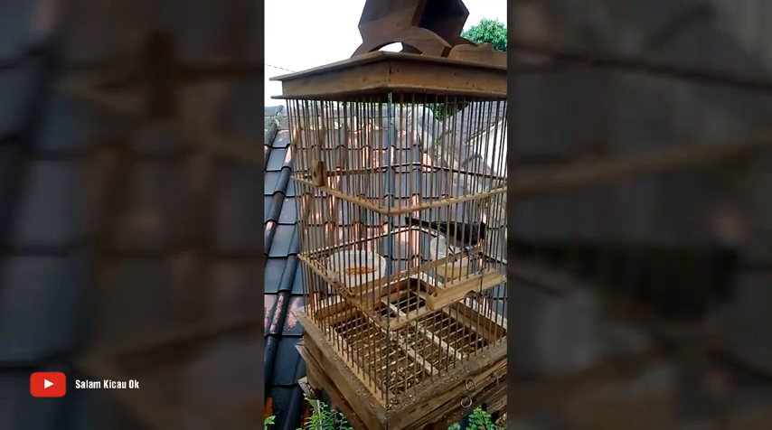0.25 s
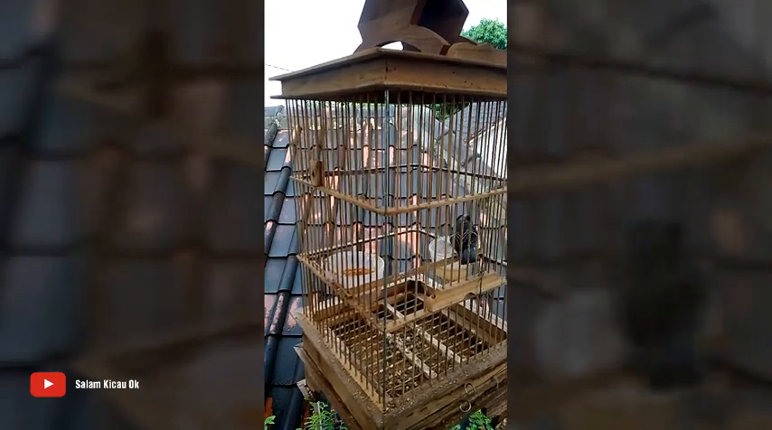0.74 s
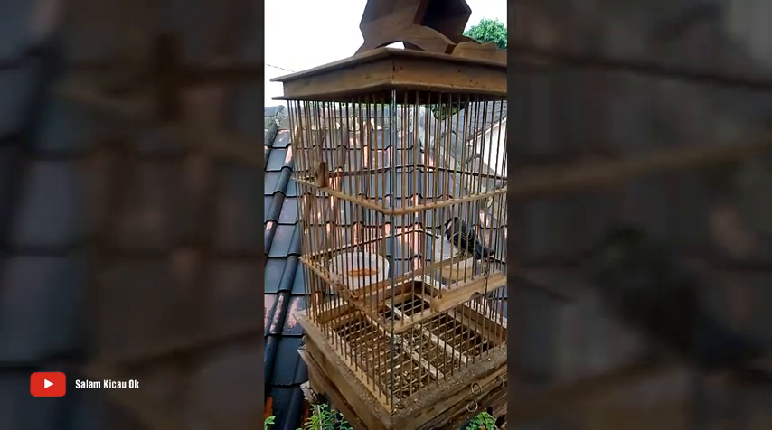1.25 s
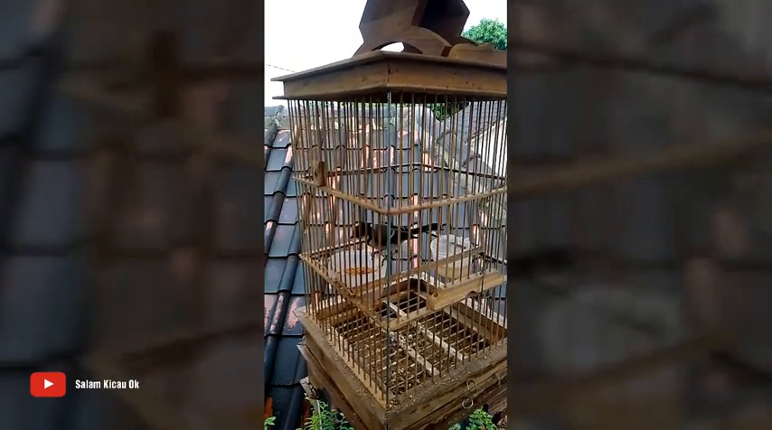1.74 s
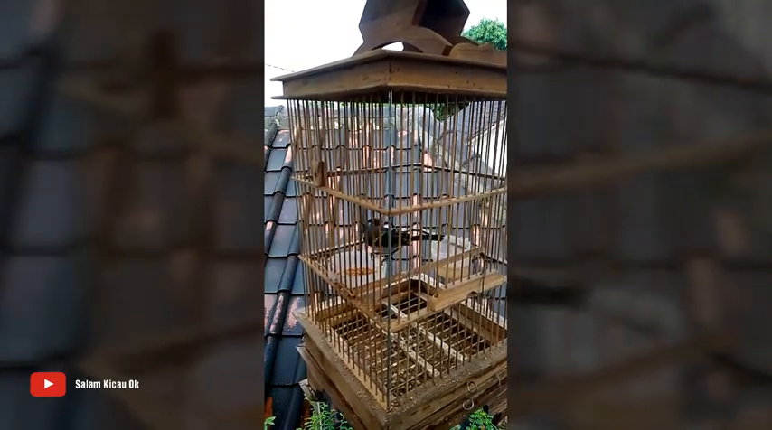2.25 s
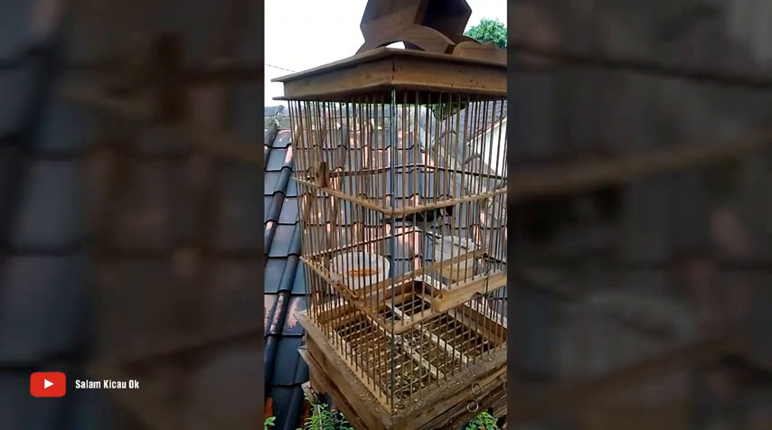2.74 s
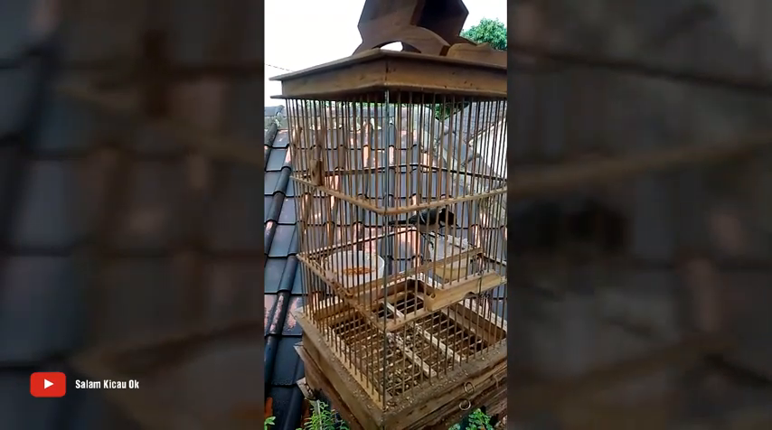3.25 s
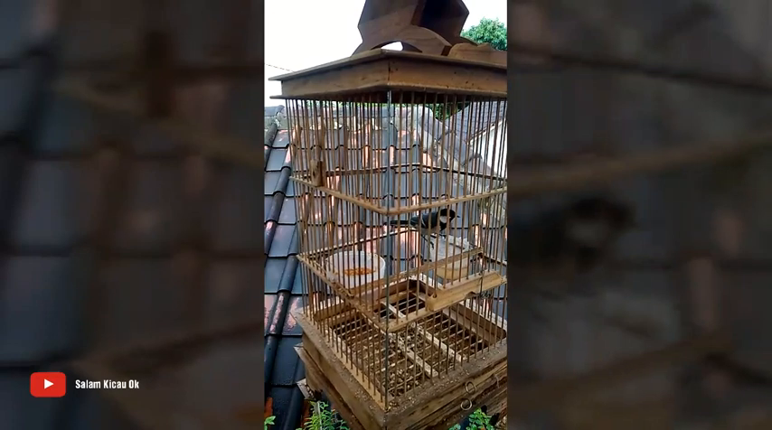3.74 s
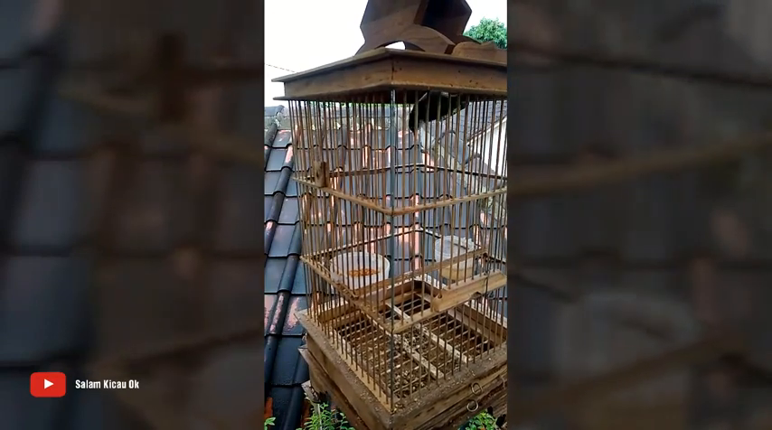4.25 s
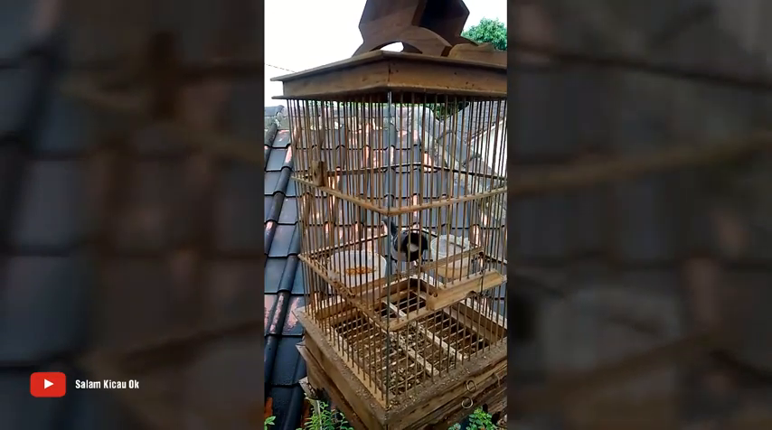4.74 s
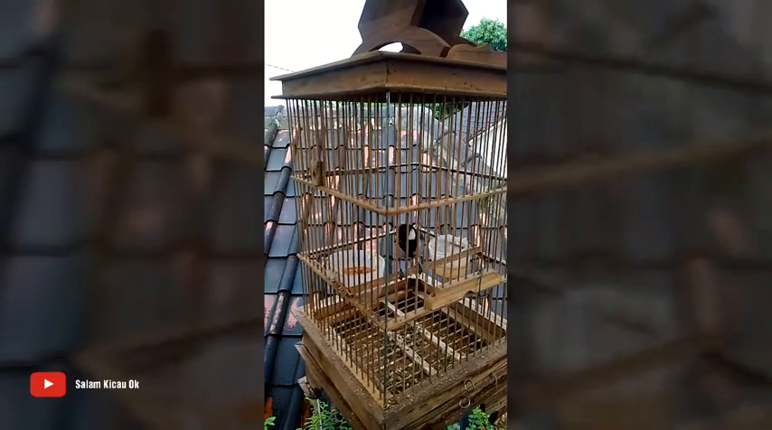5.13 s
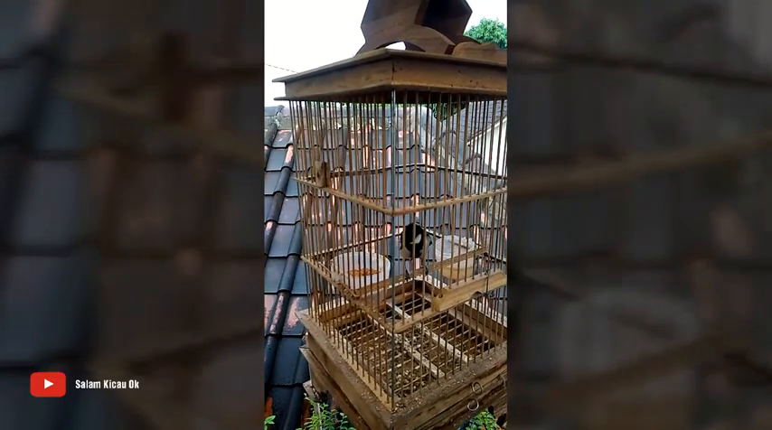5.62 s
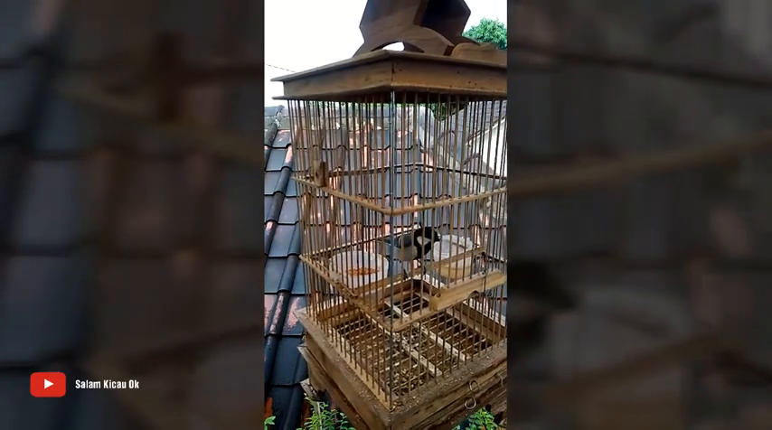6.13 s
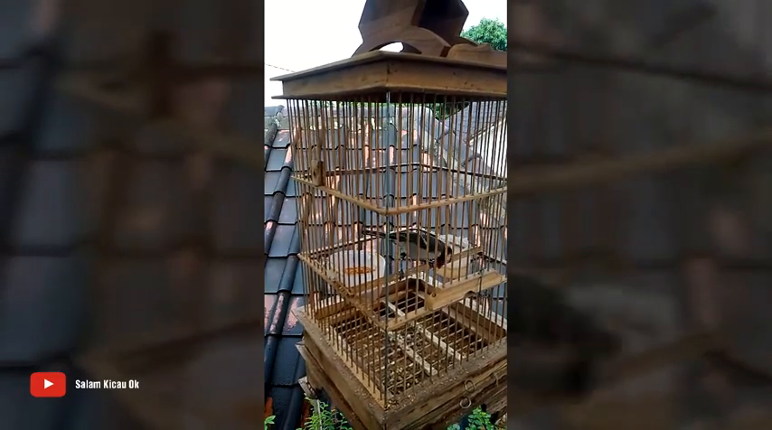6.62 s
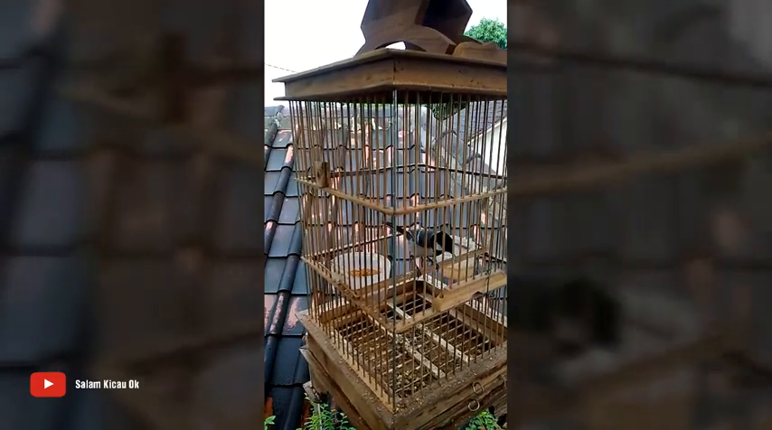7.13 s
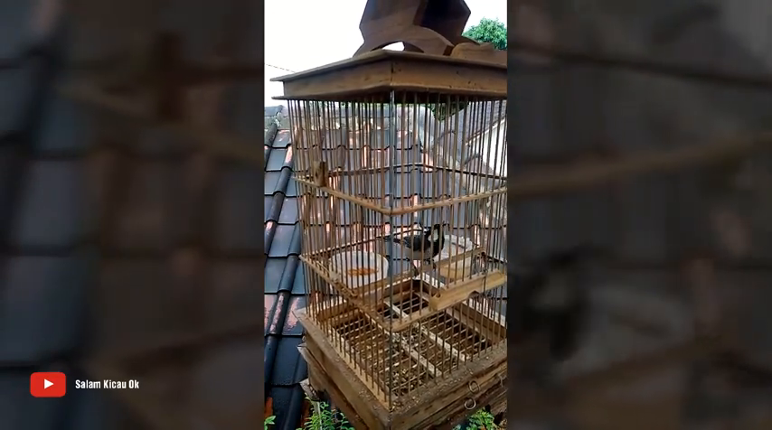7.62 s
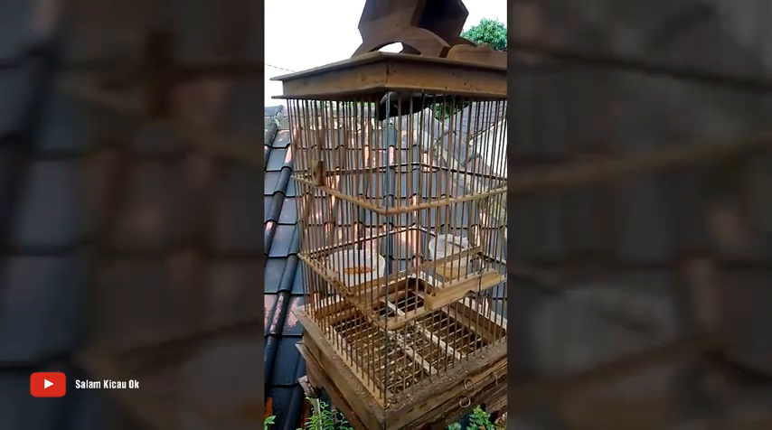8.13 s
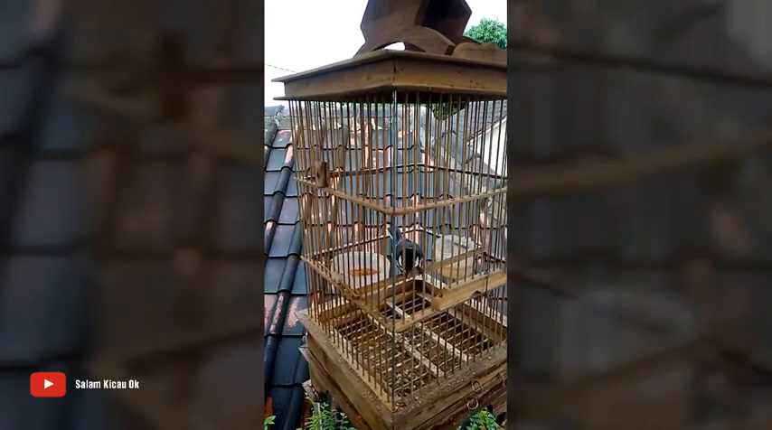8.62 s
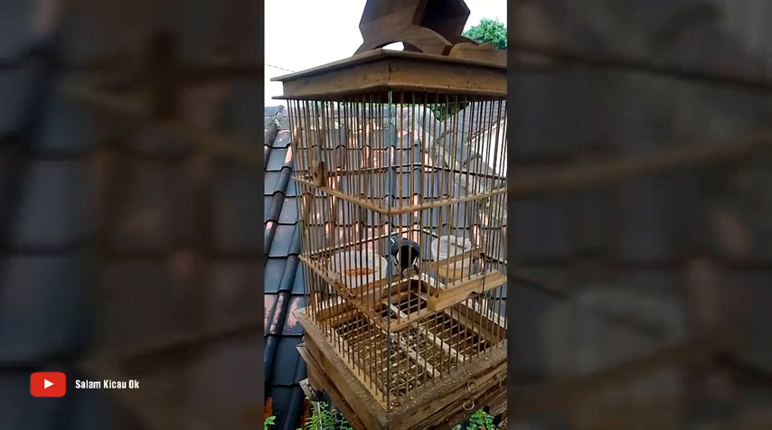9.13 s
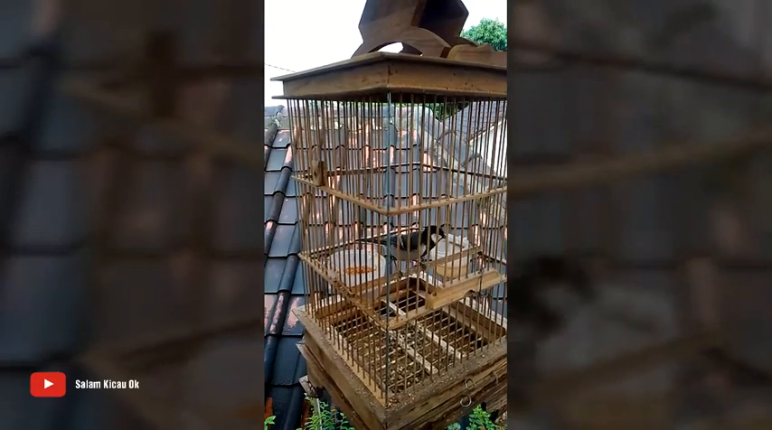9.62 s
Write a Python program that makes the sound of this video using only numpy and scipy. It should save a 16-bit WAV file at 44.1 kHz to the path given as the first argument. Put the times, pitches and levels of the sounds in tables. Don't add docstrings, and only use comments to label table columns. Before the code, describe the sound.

A small songbird in a wooden cage outdoors on a tiled roof. Claws snap and tick on bars first, feet tap perches, then a lone high whistle, two slurred chirps, a series of piercing whistles and five short raspy buzzes. A quick warble, a hopping pause, another whistle, three chirps and two bright swoops follow. Close microphone, sound leaning left, short tail, faint leaves and wind.

```python
import sys
import numpy as np
from scipy import signal
from scipy.fft import rfft, irfft, next_fast_len
from scipy.io import wavfile
from scipy.ndimage import uniform_filter1d

SR = 44100
rng = np.random.default_rng(int(sys.argv[2]) if len(sys.argv) > 2 else 0)


def invert_db(x):
    u = np.asarray(x, float) / 20
    return 10 ** u


def file_out(sig):
    cols = np.atleast_2d(sig).T
    lim = np.clip(cols, -1, 1)
    pcm = np.round(lim * 32767).astype(np.int16)
    wavfile.write(sys.argv[1], SR, pcm)


N = 435266
TOP_HZ = 15740

# share (0-1 of length), pitch_ratio, level_db, overtone_db
WHISTLE_SHAPE = [(0, .72, -30, 10), (.1, .84, -19, 8), (.2, .93, -9, 4), (.35, .962, -3, 0),
                 (.82, 1.0, 0, 0), (.88, .95, -10, 9), (1, .78, -24, 16)]
SWOOP_SHAPE = [(0, .38, -34, 22), (.2, .45, -21, 29), (.29, .62, -14, 26), (.36, .81, -3, 3),
               (.5, .855, -1.5, -1), (.79, .885, -7, 0), (.87, 1.0, 1.5, -20), (1, 0.97, -6, 5)]
SLIDE_SHAPE = [(0, .36, -32, 22), (.12, .5, -20, 24), (.2, .66, -8, 14), (.28, .83, -3, -6),
               (.45, .9, 0, -2), (.72, 1.0, -2, -8), (1, .96, -9, -8)]
RISE_SHAPE = [(0, .64, -23.5, 4.5), (.2, .73, -11, 2.5), (.45, .82, -6, 5.5), (.74, .88, -4.5, 10),
              (.84, 1.0, 6, -2.5), (1, 0.6, -11, -3.5)]
HOLD_SHAPE = [(0, .88, -8, 0), (.25, 0.93, -8, 0), (.5, 0.99, -1.5, 0), (.8, 1.0, -1, 0),
              (.88, .94, -15, 0), (1, 0.8, -30, 0)]
FALL_SHAPE = [(0, 1.16, -11.5, 4.5), (.3, 1.06, -4, -7), (.55, 1.0, -2, -8.5), (.85, .92, -10, -8),
              (1, 0.83, -18, 1)]
CHIP_SHAPE = [(0, 0.6, -12.5, -13), (.3, .93, -4, 2), (.45, 0.96, -1, 5.5), (.7, .94, -5.5, 4.5),
              (1, .8, -8, -9.5)]
BUZZ_SHAPE = [(0, .74, -11, -16), (.2, .84, -2, -13), (.45, .97, 0, -4), (.65, 1.0, -2, 2.5),
              (.82, .98, -4.5, 2), (1, .92, -28, -1)]
ARCH_SHAPE = [(0, 0.76, -21.5, -5), (.25, 0.94, -10, 2), (.55, 0.98, -1, -8.5), (.8, .78, 5, -15.5),
              (1, 0.72, -23, -9)]
LEDGE_SHAPE = [(0, .74, -12, 9), (.3, .8, -5, 9), (.68, .85, -8, 8), (.8, .97, 2, -18), (.88, 1.0, 2, -18),
               (.94, .85, -8, -8), (1, .6, -12, -4)]
RAMP_SHAPE = [(0, .7, -9, 6), (.45, .84, -1, 0), (.6, .91, -5, 2), (.69, 1.0, 1, -2), (.8, .86, -11, 0),
              (1, .65, -13, -8)]

# multiple, level_db
PURE = [(1, 0), (2, 0), (3, -15)]
THIN = [(1, 0), (2, 0), (3, -24)]
SHARP = [(1, 0), (2, -13), (3, 0)]
HOLLOW = [(1, 0), (2, 0), (3, -19)]
CUPPED = [(1, 0), (2, 0), (3, -9)]
STACK = [(2, -18), (3, 3), (4, -4), (5, -14), (6, -3), (7, -9), (8, 4), (9, -1), (10, -13), (11, -13)]
RASP = [(2, -5), (3, -1.5), (4, -1.5), (5, 2.5), (6, -3), (7, -10), (8, -20.5), (9, -24.5), (10, -24)]

# start_s, length_s, pitch_hz, level_db, glide (depth)
WHISTLES = [
    (1.712, .056, 7000, -28, .9),
    (4.506, .057, 7030, -28, .9),
    (4.809, .064, 6920, -25, 1.3),
    (5.134, .055, 6930, -25.5, .95),
    (5.497, .063, 6870, -25, 2.2),
    (8.068, .056, 7000, -26, .9),
]
WHISTLE_OVERTONES = [-22.5, -25, -24.5, -20, -22, -16]
# start_s, level_db
LEADS = [
    (5.13, -43),
    (5.498, -37),
    (8.062, -58),
]
TAILS = [
    (1.756, -38),
    (5.551, -42),
]

# start_s, length_s, level_db, overtone_db, glide
CHIPS = [
    (3.176, 0.044, -56, -3, 1.2),
    (3.572, 0.046, -58.5, -2, 1.2),
    (8.509, 0.053, -47.5, 4, 0.7),
    (8.83, 0.034, -45.5, 5.5, 1.4),
    (9.157, 0.035, -54, 6, 1.3),
]
CHIP_FALLS = [-44, -44, -43, -42, -46]
# start_s, top_hz, level_db, overtone_db, glide
RISES = [
    (3.285, 5160, -40.5, 1.5, 0.52),
    (3.672, 5580, -40, -3.5, 0.92),
    (8.608, 5620, -38.5, 9.5, 0.99),
    (8.932, 5550, -39.5, 1, .92),
    (9.261, 5540, -39.5, 0.5, .92),
]
# start_s, length_s, pitch_hz, level_db, overtone_db
HOLDS = [
    (3.323, 0.04, 4180, -36, 7.5),
    (3.715, 0.042, 4330, -33, 5),
    (8.648, 0.048, 4200, -39.5, 2),
    (8.974, 0.046, 4200, -45.5, 11.5),
    (9.303, 0.043, 4200, -47.5, 17.5),
]
# start_s, length_s, pitch_hz, level_db, glide
CROSSES = [
    (3.357, .034, 4200, -28.5, 1),
    (3.757, 0.025, 3790, -39.5, 1.0),
    (8.687, 0.019, 4190, -30, 0.81),
    (9.004, 0.027, 4250, -35, 1.0),
    (9.336, 0.029, 4400, -33, 0.87),
]

# start_s, length_s, pitch_hz, level_db, glide
SWOOPS = [
    (9.663, .046, 6825, -22.5, 1.2),
    (9.819, 0.048, 6670, -22, 1.1),
]
SLIDES = [
    (6.531, .062, 6700, -26, 1.0),
]
LEDGES = [
    (6.553, .064, 5780, -29.5, 1.0),
]
RAMPS = [
    (6.67, .066, 4480, -32, 1.0),
]
HOOKS = [
    (6.655, 0.011, 4560, -30, 2.3),
]
DROPS = [
    (5.138, 0.033, 4320, -71, 0.49),
    (5.14, 0.028, 8560, -37.5, 0.55),
    (5.318, 0.022, 3050, -47.5, 0.69),
    (6.611, 0.0068, 4370, -29, 2.26),
    (9.861, 0.014, 6000, -35, -.4),
    (9.862, 0.013, 6900, -36, -.3),
]
# start_s, pitch_hz, level_db, overtone_db
SQUEAKS = [
    (1.893, 3530, -50.5, 16),
    (4.642, 3680, -42.5, 10.5),
    (4.997, 3500, -54.5, 8),
]
# start_s, length_s, pitch_hz, level_db
BUZZES = [
    (5.664, 0.089, 1418, -35),
    (5.772, 0.09, 1363, -35.5),
    (5.88, 0.087, 1388, -36.5),
    (5.986, .08, 1360, -37),
    (6.098, 0.083, 1359, -38.5),
]

# frequency_hz, density_db (per Hz)
HAZE_SPECTRUM = [(1060, -77), (1800, -29.5), (3570, -20), (3770, -30.5), (5600, -10.5), (6530, -11.5),
                 (9190, -7), (14300, -22), (15700, -30)]
# start_s, peak_db, centre_hz, left_minus_right_db
SNAPS = [(0.2674, -64, 10500, 12), (0.2957, -34, 8900, 10), (0.4833, -37, 9760, 21), (0.509, -30, 9800, 19),
         (0.5457, -43, 10900, 12), (2.4942, -52, 10200, 10), (2.589, -50, 10000, 10), (2.897, -50, 9150, 9),
         (3.5548, -55, 8700, 0), (4.0297, -62, 10900, 9), (4.213, -40, 10200, 17), (4.4573, -45, 8720, 21),
         (4.5989, -39, 8240, 14), (5.0492, -35.5, 8700, 16), (5.4171, -57, 9200, 12),
         (6.2496, -32, 12400, 17), (7.8316, -55.5, 10700, 15), (8.0555, -42, 8500, 12),
         (8.2776, -58, 9550, 17), (8.3194, -66, 8590, 9), (8.5809, -39, 8710, 14)]
# start_s, peak_db, centre_hz, t60_s
TICKS = [(0.2625, -59, 9150, 0.34), (0.296, -43, 9000, 0.17), (0.294, -54.5, 4600, 0.22),
         (0.484, -35, 10300, 0.093), (0.5107, -43, 9600, 0.11), (.5457, -53, 10500, .18),
         (2.124, -59, 7570, 0.41), (2.153, -61.5, 6750, 0.3), (2.303, -56, 7000, 0.3),
         (2.492, -46.5, 8940, 0.24), (2.587, -50.5, 8950, 0.18), (2.897, -45, 8250, 0.22),
         (2.9682, -64, 7200, 0.15), (3.546, -51, 8065, 1), (4.0297, -61, 10900, 0.2),
         (4.084, -60.5, 6860, 0.75), (4.2096, -49.5, 8900, 0.24), (4.386, -48.5, 7600, 0.19),
         (4.458, -55, 9200, 0.06), (4.5965, -46, 9100, 0.22), (5.01, -43.5, 8500, 0.27),
         (5.4165, -51.5, 7850, 0.18), (6.2512, -35.5, 11100, 0.19), (7.21, -67.5, 8640, 0.13),
         (7.3328, -56.5, 8080, 0.16), (7.524, -58.5, 6770, 1), (7.7495, -61, 7410, 0.23),
         (8.051, -47, 9300, 0.84), (8.413, -53.5, 10700, 0.32), (8.4795, -55, 9405, 0.15),
         (8.581, -37, 9250, 0.34)]
# start_s, peak_db, centre_hz, t60_s, left_minus_right_db
KNOCKS = [(0.255, -51, 1450, 0.09, 15), (0.401, -61, 1040, 0.49, 20), (0.578, -70, 790, 0.19, 30),
          (1.019, -64, 2040, 0.046, 2.5), (1.195, -51, 660, 0.076, 13.5), (2.154, -55.5, 720, 0.21, 25),
          (2.304, -67.5, 704, 0.087, 35), (3.525, -49.5, 1980, 0.11, 18), (3.732, -41, 1136, 0.15, 13),
          (4.205, -50, 2840, 0.085, 16), (4.505, -47, 914, 0.22, 17), (4.621, -44, 1610, 0.077, 9),
          (5.027, -56.5, 837, 0.44, 22), (7.17, -60.5, 860, 0.21, 33), (7.245, -63, 674, 0.21, 22),
          (7.335, -67.5, 954, 0.13, 29.5), (7.611, -54, 692, 0.19, 23), (8.584, -51, 1510, 0.26, 17)]
# start_s, peak_db, centre_hz, t60_s, left_minus_right_db
FAINT_KNOCKS_EARLY = [(0.874, -71, 724, 0.07, 12), (1.115, -58, 525, 0.07, 14), (1.195, -57, 670, 0.07, 9),
                      (1.326, -60, 676, 0.089, 16), (1.395, -62, 538, 0.055, 14), (1.743, -63, 673, 0.07, 12),
                      (1.842, -69, 676, 0.07, 10), (1.908, -39, 2840, 0.08, 14), (2.162, -58, 710, 0.055, 14),
                      (2.308, -67, 762, 0.064, 12), (2.503, -75, 2820, 0.07, 10), (2.584, -61, 2510, 0.083, 15),
                      (2.768, -61, 501, 0.076, 14), (2.902, -61, 2500, 0.089, 17)]
FAINT_KNOCKS_MIDDLE = [
    (3.913, -57, 670, 0.076, 8),
    (4.018, -68, 2280, 0.07, 7.3),
    (4.151, -69, 2610, 0.07, 8),
    (4.212, -58, 3100, 0.07, 8),
    (4.301, -59, 2700, 0.07, 8),
    (4.507, -58, 890, 0.07, 8),
]
FAINT_KNOCKS_LATE = [
    (7.089, -67, 915, 0.063, 10),
    (7.164, -54.5, 921, 0.07, 10),
    (7.246, -59.5, 660, 0.07, 10),
    (7.336, -66, 921, 0.07, 10),
    (7.612, -51.5, 708, 0.046, 8.4),
    (7.668, -66, 727, 0.07, 10),
    (7.84, -75, 762, 0.089, 10),
    (8.061, -63, 3040, 0.07, 10),
]
# start_s, peak_db,
# centre_hz, t60_s, left_minus_right_db
PEEPS = [
    (1.022, -78.5, 3700, 0.092, 17.5),
    (1.9013, -73, 3096, 0.17, 9),
    (3.292, -68, 2750, 0.1, 4),
    (5.0136, -67, 3010, 0.11, 11),
    (8.06, -76.5, 3190, 0.17, 15),
    (8.1224, -75.5, 2710, 0.12, 6),
    (8.4808, -73.5, 2420, 0.27, 12),
    (9.705, -66, 3200, .1, 10),
    (6.612, -60, 3300, .08, 9),
    (4.645, -70.5, 4660, 0.18, 9),
]
# frequency_hz, density_db (per Hz)
LEAF_SPECTRUM = [(88, -45.5), (150, -24.5), (258, -9.5), (595, -13.5), (722, -15.5), (1450, -20.5),
                 (2140, -17.5), (2600, -20.5), (5330, -25.5), (8830, -16), (10700, -22.5), (13300, -39),
                 (15500, -64.5)]
# low_hz, high_hz
RUSTLE_BANDS = [(130, 410), (400, 1000), (1000, 4000)]
# time_s, level_db
BREEZE = [(0.0, -72.5), (0.71, -74.5), (1.07, -74), (2.86, -76), (3.08, -75), (4.18, -75), (4.26, -72.5),
          (5.72, -65.5), (6.02, -77.5), (7.39, -75.5), (8.69, -75.5), (9.87, -71)]
# peak_s, lift_db
GUSTS = [(0.242, 24), (1.349, 11), (3.16, 7), (3.4, -3), (3.722, 18.5), (3.86, 29), (4.152, 27.5),
         (4.287, 25), (4.54, 7), (4.74, 9), (4.94, 10), (5.319, 13.5), (5.549, 23), (6.429, 14.5),
         (7.229, 17.5), (7.68, 5), (8.03, 14.5), (9.419, 14), (9.701, 23)]


def song():
    hoarse = slurred_phrase() + free_notes() + squeaks() + buzzes()
    throat = signal.butter(6, 1600, "high", fs=SR, output="sos")
    return whistles(), signal.sosfilt(throat, hoarse)


def whistles():
    notes = [voiced([note], over_db)[0] for note, over_db in zip(WHISTLES, WHISTLE_OVERTONES)]
    return sing(WHISTLE_SHAPE, notes, THIN, rough=.13, rough_hz=120, knee=.9)


def slurred_phrase():
    chips = [(s, length, 1226, db, over_db, glide) for s, length, db, over_db, glide in CHIPS]
    rises = [(s, .048, hz, db, over_db, glide) for s, hz, db, over_db, glide in RISES]
    holds = [(*hold, .96) for hold in HOLDS]
    falls = [(chip[0] + .025, .012, 4200, db, -12.5, 1) for chip, db in zip(CHIPS, CHIP_FALLS)]
    falls += voiced(CROSSES, over_db=-8)
    falls += [(s, .013, 4050, db, -51 - db, -3.0) for s, db in LEADS]
    falls += [(s, .012, 4900, db, -60 - db, 2.1) for s, db in TAILS]
    return (sing(CHIP_SHAPE, chips, STACK, upper_count=5, rough=.42, rough_hz=220)
            + sing(RISE_SHAPE, rises, THIN, rough=.3, rough_hz=120)
            + sing(HOLD_SHAPE, holds, PURE, rough=.3, rough_hz=120)
            + sing(FALL_SHAPE, falls, THIN, rough=.3, rough_hz=120))


def free_notes():
    swoop_db, warble_db, drop_db = -16, -14, -12.5
    return (sing(SWOOP_SHAPE, voiced(SWOOPS, swoop_db), HOLLOW, rough=.3, rough_hz=150)
            + sing(SLIDE_SHAPE, voiced(SLIDES, swoop_db), HOLLOW, rough=.35, rough_hz=200)
            + sing(LEDGE_SHAPE, voiced(LEDGES, warble_db), THIN, rough=.4, rough_hz=200)
            + sing(RAMP_SHAPE, voiced(RAMPS, warble_db), CUPPED, rough=.4, rough_hz=120)
            + sing(HOLD_SHAPE, voiced(HOOKS, drop_db), PURE, rough=.3, rough_hz=120)
            + sing(FALL_SHAPE, voiced(DROPS, drop_db), THIN, rough=.3, rough_hz=120))


def squeaks():
    notes = [(s, .026, hz, db, over_db, 1.05) for s, hz, db, over_db in SQUEAKS]
    return (sing(ARCH_SHAPE, notes[::2], THIN, rough=.5, rough_hz=300)
            + sing(ARCH_SHAPE, notes[1:2], SHARP, rough=.45, rough_hz=300))


def buzzes():
    notes = [(*row, 1.5 + 1.02 * k, .88) for k, row in enumerate(BUZZES)]
    beat_hz = 270 * (1 + .4 * drift(60))
    throb = 1 + .5 * np.sin(2 * np.pi * np.cumsum(beat_hz) / SR)
    return throb * sing(BUZZ_SHAPE, notes, RASP, upper_count=4, rough=.52, rough_hz=320)


def voiced(notes, over_db):
    return [(s, length, hz, db, over_db, glide) for s, length, hz, db, glide in notes]


def sing(shape, syllables, partials, rough, rough_hz, upper_count=2, knee=0.17):
    out = np.zeros(N)
    share, ratio, shape_db, bright_db = np.transpose(shape)
    flutter = 1.8 * np.tanh(drift(rough_hz) / 1.5)
    for s, length, hz, level_db, over_db, glide in syllables:
        at = round(s * SR)
        u = np.arange(min(round(length * SR), N - at)) / (length * SR)
        bend = np.interp(u, share, ratio)
        pitch_hz = hz * bend * np.maximum(bend, knee) ** (glide - 1)
        phase = 2 * np.pi * np.cumsum(pitch_hz) / SR
        edge = np.clip(np.minimum(u, 1 - u) * 20, 0, 1)
        for row, (_, partial_db) in enumerate(partials):
            k = row + round(partials[0][0])
            db = level_db + partial_db + np.interp(u, share, shape_db)
            if k >= upper_count:
                db = db + over_db + np.interp(u, share, bright_db)
            shake = np.roll(flutter, -at - 997 * k)[:len(u)]
            audible = np.gradient(phase) * k < 2 * np.pi * TOP_HZ / SR
            level = np.sqrt(2) * invert_db(db) * edge * audible * (1 + rough * shake)
            wave = np.sin(k * phase + k * k + 1.4 * rough * shake[::-1])
            out[at:at + len(u)] += level * wave
    return out


def haze(clear, hoarse):
    power = uniform_filter1d((invert_db(-9.0) * clear + hoarse) ** 2, round(0.041 * SR))
    fade = np.exp(-1 / (0.027 * SR))
    power = power + 0.29 * signal.lfilter([1 - fade], [1, -fade], power)
    noise = coloured(HAZE_SPECTRUM, channels=2) * np.sqrt(np.maximum(power, 0))
    return panned(noise, 8.0) * invert_db(-13.0)


def ports(x):
    treble = signal.sosfilt(signal.butter(2, 9000, "high", fs=SR, output="sos"), x)
    return np.array([np.roll(x, 1), invert_db(-11) * (x + 0.8 * treble)])


def roof(x):
    t = np.arange(SR // 2) / SR
    decay = invert_db(-60 * t / 0.14) + invert_db(7.0 - 60 * t / 0.018)
    tail = rng.standard_normal((2, len(t))) * decay * np.clip(t / 0.0043, 0, 1)
    tail = tail / np.sqrt(np.sum(tail ** 2) / 2)
    return signal.fftconvolve(x[None], tail, axes=1)[:, :N]


def cage():
    tick_events = [(*tick, 14.5) for tick in TICKS]
    snap_events = [(s, db, hz, .03, left_db) for s, db, hz, left_db in SNAPS]
    tap_events = FAINT_KNOCKS_EARLY + FAINT_KNOCKS_MIDDLE + FAINT_KNOCKS_LATE
    ticks = contacts(tick_events, 0.29, grain_db=2.0, rise_s=0.002, trim_db=-7.5)
    snaps = contacts(snap_events, 0.18, grain_db=5.5, rise_s=0.0004, trim_db=-9.5)
    knocks = contacts(KNOCKS, 0.22, grain_db=2.5, rise_s=0.0077, trim_db=-5.5)
    taps = contacts(tap_events, 0.21, grain_db=3.0, rise_s=0.003, trim_db=-5.0)
    return ticks + snaps + knocks + taps


def contacts(events, octaves, grain_db, rise_s, trim_db):
    out = np.zeros((2, N))
    white = rng.standard_normal((2, N)) * invert_db(grain_db * drift(300))
    white[1] = 0.5 * white[0] + 2.23 * white[1]
    for s, peak_db, hz, t60, left_db in events:
        at = round(s * SR)
        t = np.arange(min(SR // 3, N - at)) / SR
        burst = rms_one(band(white[:, at:at + len(t)], hz * 2 ** -octaves, hz * 2 ** octaves))
        fade = np.clip(t / rise_s, 0, 1) * invert_db(peak_db + trim_db - 60 * t / max(t60, .01))
        out[:, at:at + len(t)] += burst * fade * invert_db(np.array([[.5], [-.5]]) * left_db)
    return out


def soft_peeps():
    return contacts(PEEPS, 0.16, grain_db=0.0, rise_s=0.0043, trim_db=17.0)


def leaves():
    shared, left, right = coloured(LEAF_SPECTRUM, channels=3)
    hiss = rms_one(np.array([left, right]) + 0.6 * shared)
    for low_hz, high_hz in RUSTLE_BANDS:
        swing = invert_db(7 * np.tanh(drift(7.8)) - 1.5)
        hiss = hiss + band(hiss, low_hz, high_hz, order=1) * (swing - 1)
    return panned(hiss, 7.5) * invert_db(-72.5 + 0.4 + 1.0 * drift(5.0))


def wind():
    t = np.arange(N) / SR
    white = rng.standard_normal((3, N))
    gust_s = 0.029
    breeze_db = np.interp(t, *np.transpose(BREEZE))
    lifts = [lift_db * np.clip(1 - np.abs(t[::64] - s) / (2 * gust_s), 0, 1) for s, lift_db in GUSTS]
    gust_db = np.interp(t, t[::64], np.max(lifts, axis=0))
    buffet = rms_one(band(white[:2] + 0.36 * white[2], 18, 55))
    buffet = buffet * invert_db(breeze_db + gust_db + 4.6 * drift(8))
    rumble = rms_one(band(white[:2] + 3.8 * white[2], 44, 124.3))
    rumble = rumble * invert_db(3.5 + breeze_db + 0.097 * gust_db)
    return buffet + panned(rumble, 6.0) * invert_db(3.0)


def motor():
    hz = 53.1
    hum = rms_one(band(rng.standard_normal(N), hz * .94, hz / .94))
    return hum * invert_db(-65.5) * np.clip((1 - np.arange(N) / SR) * 10, 0, 1)


def at_hz(points, hz):
    known_hz, level_db = np.transpose(points)
    return np.interp(np.log(hz), np.log(known_hz), level_db)


def rms_one(x):
    return x / np.sqrt(np.mean(x ** 2) + 1e-20)


def band(x, low_hz, high_hz, order=2):
    edges_hz = [low_hz, min(high_hz, .45 * SR)]
    return signal.sosfilt(signal.butter(order, edges_hz, "band", fs=SR, output="sos"), x)


def drift(rate_hz):
    r = np.exp(-2 * np.pi * rate_hz / SR)
    walk = signal.lfilter([1], [1, -2 * r, r * r], rng.standard_normal(N + SR))
    return rms_one(walk[SR:])


def coloured(spectrum, channels):
    size = next_fast_len(N + N % 2, real=True)
    hz = np.maximum(np.fft.rfftfreq(size, 1 / SR), 1)
    bins = rfft(rng.standard_normal((channels, size))) * invert_db(at_hz(spectrum, hz))
    return rms_one(irfft(bins, size)[:, :N])


def panned(x, left_db):
    return x * np.array([[1], [invert_db(-left_db)]])


def scene():
    clear, hoarse = song()
    bird = clear + hoarse
    near = ports(bird) + panned(roof(bird), 9.9) * invert_db(-5.5)
    background = soft_peeps() + leaves() + wind() + motor()
    return near + haze(clear, hoarse) + cage() + background


def starved(x, depth_db, tilt_db, chance_db, startle, spare_db):
    hz, _, cells = signal.stft(x, SR, "cosine", 2048)
    treble = np.abs(cells[:, (hz > 2500) & (hz < TOP_HZ)])
    treble_db = 40 * np.log10(np.mean(treble ** .5, axis=1) + 1e-20) + 33
    jump_db = np.clip(np.diff(treble_db, prepend=0), 0, 15)
    treble_db = np.maximum(treble_db, np.roll(treble_db, 2, axis=1) - 8)
    edges = np.searchsorted(hz, 300 * 1.13 ** np.arange(34))
    luck = uniform_filter1d(rng.standard_normal((len(edges), cells.shape[2])), size=3) * np.sqrt(3)
    for k, (low, high) in enumerate(zip(edges, edges[1:])):
        band_db = 10 * np.log10(np.sum(np.abs(cells[:, low:high]) ** 2, axis=1) + 1e-20)
        margin_db = band_db - treble_db + depth_db - tilt_db * min(k, 46 - k)
        margin_db = margin_db - startle * jump_db + chance_db * luck[k]
        margin_db = margin_db + spare_db * np.clip((k - 17) / 4, 0, 1)
        coarse_db = 3.2 * luck[k] * (band_db < treble_db - 14)
        drop_db = -28 * np.clip(.5 - margin_db / 3, 0, 1)
        cells[:, low:high] *= invert_db(drop_db + coarse_db)[:, None]
    return signal.istft(cells, SR, "cosine", 2048)[1][:, :N]


def band_limit(x):
    return signal.sosfilt(signal.butter(12, 15740, fs=SR, output="sos"), x)


def record(dry):
    thin = starved(dry, depth_db=50.5, tilt_db=1.1872, chance_db=6.5, startle=0.58, spare_db=6.5)
    top_cut = signal.cheby2(10, 60, TOP_HZ + 250, fs=SR, output="sos")
    mix = signal.sosfilt(top_cut, thin)
    return band_limit(mix)


dry = scene()
out = record(dry)
file_out(out)
```